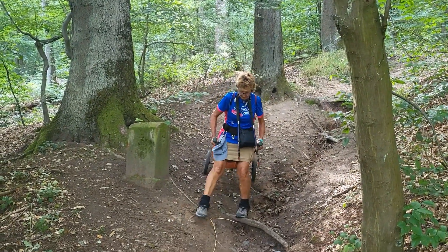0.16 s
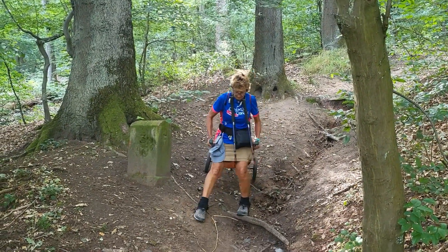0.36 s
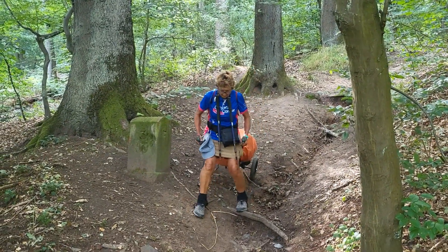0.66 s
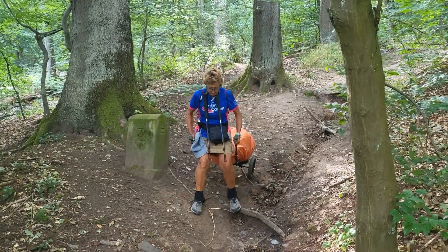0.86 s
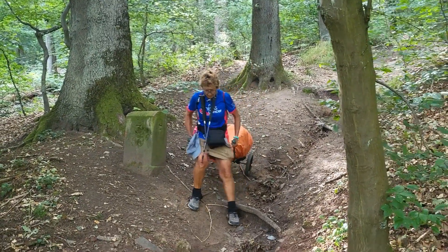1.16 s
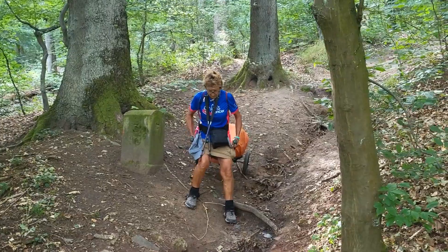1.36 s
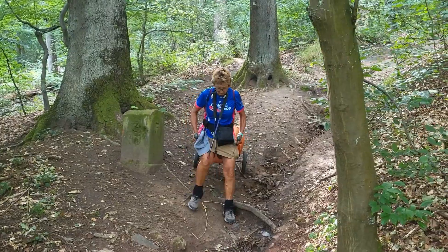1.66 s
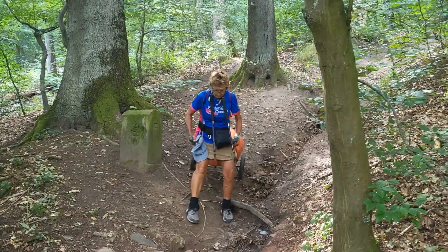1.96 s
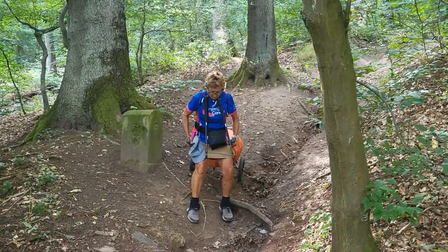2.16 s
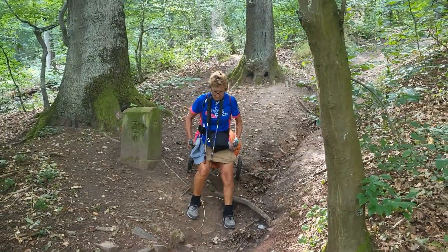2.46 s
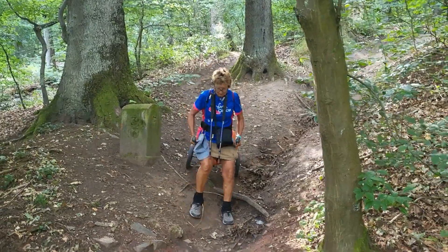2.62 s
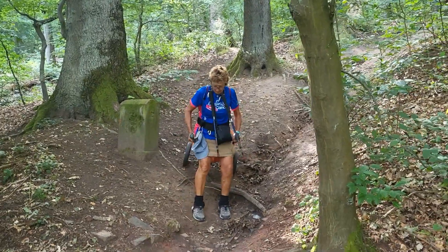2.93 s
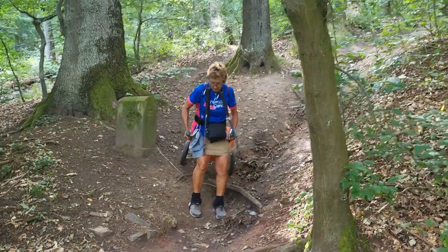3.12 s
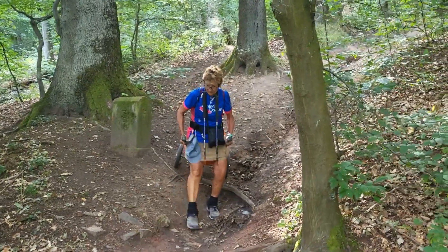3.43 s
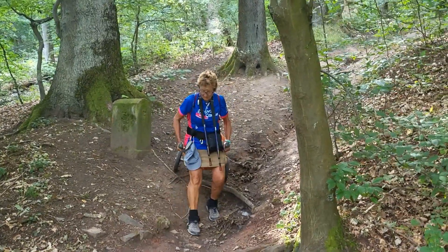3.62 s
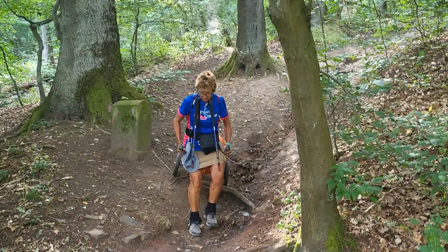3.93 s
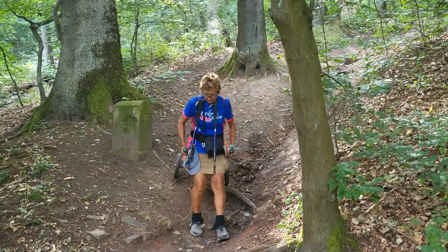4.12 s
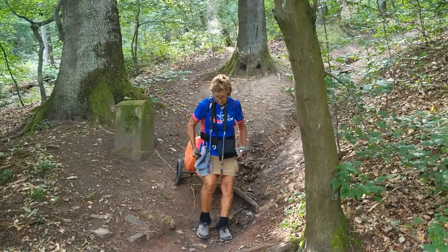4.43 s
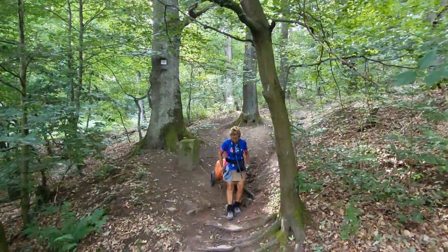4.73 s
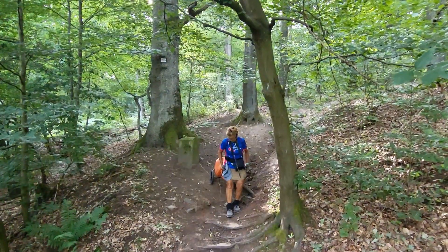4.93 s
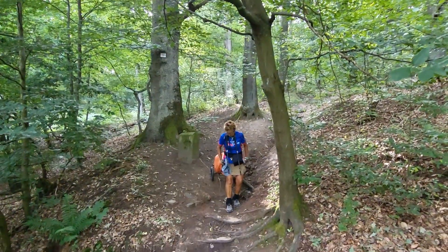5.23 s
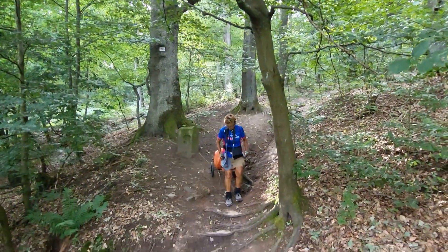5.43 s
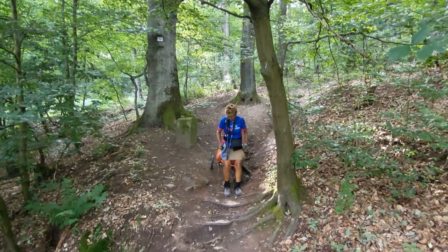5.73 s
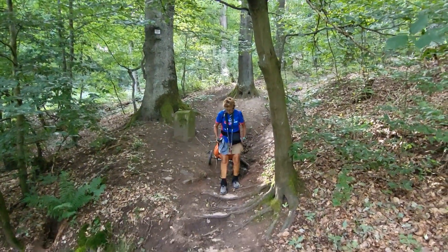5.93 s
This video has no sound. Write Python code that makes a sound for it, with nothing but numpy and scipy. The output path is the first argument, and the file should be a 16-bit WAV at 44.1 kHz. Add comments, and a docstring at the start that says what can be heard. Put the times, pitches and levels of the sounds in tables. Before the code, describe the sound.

Wooden knocks rattle as a small trolley bumps over roots, shoes and pole tips scuff dirt, with water trickling left over low rumble.

```python
"""Low rumble, murmur, hiss and a faint trickle off to the left open a quiet forest; later a low hum wanders.
A walker with poles eases a two-wheeled trolley down a dirt path: it knocks over roots, shoes and pole
tips scuff and click, stones crunch, leaves swish and tyres roll through litter.
Shaped noise makes rumble, murmur and hiss; dying sine modes make bubbles, clicks and knocks;
random clicks make spray and, under level curves, earth, grit, stones, leaves and litter."""
import sys
import numpy as np
from scipy import signal
from scipy.fft import rfft, irfft
from scipy.io import wavfile
from scipy.ndimage import uniform_filter1d

SR = 44100
rng = np.random.default_rng(int(sys.argv[2]) if len(sys.argv) > 2 else 0)


def persist_wave(psi):
    """Save psi, clipped to +-1, as 16-bit WAV."""
    counts = np.round(np.clip(psi, -1, 1) * 32767).astype(np.int16)
    wavfile.write(sys.argv[1], SR, np.atleast_2d(counts).T)


N = 268128
HZ = np.fft.rfftfreq(N, 1 / SR)
TIME = np.arange(N) / SR

# level of the fine bright fizz and small bubbles: time_s, level_db
FIZZ_CURVE = [(0, -54), (.12, -54), (.27, -57), (.42, -49), (.55, -54.5), (.65, -49.5), (1.12, -50.5),
              (1.3, -51.5), (1.65, -49), (1.74, -51), (1.9, -50), (2.22, -50.5), (2.42, -49.5), (2.86, -52),
              (2.94, -50), (3.1, -53.5), (3.24, -51), (3.58, -58.5), (3.72, -54.5), (3.87, -56),
              (4.03, -53), (4.17, -60), (4.28, -52.5), (4.5, -57.5), (4.58, -55), (4.68, -58), (4.9, -53.5),
              (5.1, -58), (5.3, -52.5), (5.5, -57), (6.0, -53.5), (6.08, -60)]
# spectrum of crunching earth: freq_hz, relative_density_db_per_hz
EARTH_SPECTRUM = [(150, 4), (330, 0), (650, 6), (900, 2.5), (1400, -1), (1800, -1.5), (2300, -9.5),
                  (3000, -38), (5000, -35)]


def amp(db):
    """Amplitude ratio of a level in dB."""
    return 10 ** (np.asarray(db) / 20)


def unit(x):
    """Scales x to unit rms."""
    return x / np.sqrt(np.mean(x ** 2) + 1e-20)


def read(points, hz):
    """A spectrum joined by straight lines on a log-frequency axis."""
    f, value = np.transpose(points)
    return np.interp(np.log(hz + 1), np.log(f + 1), value)


def along(rows, s):
    """The columns of a curve at the times s."""
    times, *columns = np.transpose(rows)
    return [np.interp(s, times, column) for column in columns]


def colour(x, spectrum):
    """Gives x a spectrum and unit rms."""
    return unit(irfft(rfft(x) * amp(read(spectrum, HZ)), N))


def add(mix, s, sound):
    """Adds a sound into the mix at s seconds, cut at the end."""
    part = mix[..., max(round(s * SR), 0):][..., :sound.shape[-1]]
    part += sound[..., :part.shape[-1]]


def pair(three, same):
    """Two channels from one shared and two separate signals; same is the shared power."""
    same = np.clip(same, 0, 1)
    return np.sqrt(same) * three[0] + np.sqrt(1 - same) * three[1:]


def noise(spectrum, same):
    """Smooth stereo noise of unit rms."""
    return colour(pair(rng.standard_normal((3, N)), same), spectrum)


def grains(spectrum, per_s, spread_db, same):
    """Stereo crackle of unit rms: random clicks, a few much larger than the rest."""
    size_db = spread_db * np.minimum(rng.exponential(1, (3, N)), 4)
    size = amp(size_db) * rng.standard_normal((3, N))
    struck = rng.random((3, N)) < per_s / SR
    return colour(pair(size * struck, same), spectrum)


def patches(x, depth_db):
    """Lets small patches of pitch and time swell and sink on their own, at unit rms."""
    z = signal.stft(x, nperseg=512, noverlap=384)[2]
    field = rng.standard_normal(z.shape[1:])
    field = uniform_filter1d(field, size=4, axis=0)
    field = unit(uniform_filter1d(field, size=14, axis=1))
    return unit(signal.istft(z * amp(depth_db * field), nperseg=512, noverlap=384)[1][:, :N])


def ring(hz, t60, glide=0, onset=0.00016):
    """One dying mode; glide is its relative rise in pitch per second, t60 and onset are in s."""
    t = TIME[:SR // 6]
    tone = np.sin(2 * np.pi * hz * t * (1 + glide * t / 2))
    decay = np.exp(-np.log(1000) * t / t60)
    return tone * decay * (1 - np.exp(-t / onset))


def lowpass(x, hz, order):
    """Butterworth low-pass."""
    return signal.sosfilt(signal.butter(order, min(hz, SR / 2 - 1), fs=SR, output="sos"), x)


def uneven(start, end, per_s):
    """Irregular moments at a mean rate, each with two random deviations of unit rms."""
    slots = np.arange(start, end, 1 / per_s)
    chance = rng.random((len(slots), 3))
    deviations = np.sqrt(12) * (chance[:, 1:].T - .5)
    return slots + chance[:, 0] / per_s, *deviations


def aside(x, lead_ms):
    """A sound from one side reaches the nearer ear first; positive is left."""
    side = np.array([[1], [-1]])
    return irfft(rfft(x) * np.exp(1j * np.pi * HZ * side * lead_ms / 1000), N)


def woods(x):
    """Sparse echoes off ground and trunks, each band dying at its own speed."""
    # freq_hz, echo_t60_s
    echo_decay = [(100, 0.027), (500, 0.22), (1500, 0.18), (4000, 0.3), (12000, 0.025)]
    taps = rng.standard_normal((2, SR // 2)) * (rng.random((2, SR // 2)) < 2000 / SR)
    taps[:, :100] = 0  # no echo in the first 2.3 ms
    hz, t, z = signal.stft(taps, SR, nperseg=256)
    decay = np.exp(-np.log(1000) * t / read(echo_decay, hz)[:, None])
    tail = signal.istft(z * decay, SR, nperseg=256)[1]
    return signal.fftconvolve(x, tail / np.linalg.norm(tail[0]), axes=1)[:, :N]


def background():
    """Noise as rumble, the mottled murmur of the far forest, and faintly shifting hiss."""
    # time_s, rumble_db, forest_db
    level_curve = [(0, -49, -69), (.33, -48, -66), (1.05, -48.5, -60), (1.75, -45, -62),
                   (2.15, -46.5, -59.5), (3.0, -47, -57), (3.65, -41.5, -57), (3.95, -47, -62),
                   (4.2, -42.5, -58.5), (4.7, -42, -56.5), (5.3, -38, -57), (5.58, -40.5, -60),
                   (5.8, -37, -59), (6.08, -46, -54)]
    # spectra: freq_hz, relative_density_db_per_hz
    rumble_spectrum = [(15, -1), (28, -16), (42, 2), (75, 2.5), (110, -5.5), (160, -6), (250, -17),
                       (400, -26.5), (900, -74)]
    forest_spectrum = [(150, -6), (300, 3.5), (700, 3), (1100, 0.5), (1800, -15), (2800, -13.5),
                       (5000, -21.5)]
    hiss_spectrum = [(1000, -4.5), (2200, -8), (3000, -24), (4400, 4), (8000, 5), (9500, 0), (12000, -3.5),
                     (16000, 2)]
    rumble_db, forest_db = along(level_curve, TIME)
    rumble = amp(rumble_db) * noise(rumble_spectrum, same=0.93)
    murmur = amp(forest_db) * patches(noise(forest_spectrum, same=0.4), depth_db=3.5)
    hiss = amp(-57.0) * patches(noise(hiss_spectrum, same=0.011), depth_db=2.5)
    return rumble + murmur + hiss


def bubble(hz):
    """A bubble rings for a fixed count of cycles and rises a little in pitch."""
    cycles_to_60_db_down = 41.3
    longest_t60_s = 0.069  # acts only below about 600 Hz
    rise_per_s_at_1_khz = 4.7  # relative pitch rise
    t60_s = min(cycles_to_60_db_down / hz, longest_t60_s)
    return ring(hz, t60_s, glide=rise_per_s_at_1_khz * np.sqrt(hz / 10 ** 3), onset=1.15 / hz)


def lesser_drips():
    """Each hollow drips irregularly near its own pitch, its mean level following that of the fizz."""
    # pitch_hz, drips_per_s, level_above_fizz_curve_db
    hollow_rows = [(1245, 1.0, 4), (1880, 2.4, 3), (4000, 2.7, 3.5), (7400, 2.2, 8)]
    detune, spread_db = 0.052, 4  # rms log pitch ratio, rms level
    rows = []
    for hz, per_s, db in hollow_rows:
        s, level_dev, pitch_dev = uneven(0, N / SR, per_s)
        level_db = along(FIZZ_CURVE, s)[0] + db + spread_db * level_dev
        rows += zip(s, level_db, hz * np.exp(detune * pitch_dev))
    return rows


def crackle():
    """Tiny bright spatters, each a few milliseconds of fizz, scattered at random."""
    # freq_hz, relative_density_db_per_hz
    crackle_spectrum = [(900, -12), (1800, -7), (3000, -14), (4100, 4), (5200, -3), (7700, 2.5),
                        (9000, -14), (15000, -10)]
    per_s, fade_s, spread_db = 32, 0.0028, 5.5
    level = np.zeros(N)
    for s, level_dev, _ in zip(*uneven(0, N / SR, per_s)):
        add(level, s, amp(spread_db * level_dev) * np.exp(-TIME[:800] / fade_s))
    return unit(level) * patches(noise(crackle_spectrum, same=0.18), depth_db=5.0)


def trickle():
    """Water off to the left: splashing, ringing drips, many small bubbles, spray and dulled echoes."""
    # single drips, loud and faint: start_s, level_db, pitch_hz
    drip_rows = [(0.039, -36.5, 2340), (.097, -38.5, 2120), (.287, -39, 1960), (0.385, -35.5, 1120),
                 (0.8432, -31, 6400), (1.0137, -30, 4260), (1.0135, -24.5, 7440), (1.0363, -25, 7360),
                 (1.0365, -36, 4120), (1.083, -31, 6400), (1.096, -30, 920), (1.117, -38, 1100),
                 (1.135, -38, 2350), (1.1673, -30, 7450), (1.24, -33.5, 1163), (1.305, -33, 7000),
                 (1.31, -34, 1137), (1.3542, -29.5, 4000), (1.373, -25, 6940), (1.541, -34, 1042),
                 (1.5422, -29, 5460), (1.5543, -25, 4050), (1.617, -32.5, 4500), (1.617, -34.5, 1820),
                 (1.695, -39.5, 1880), (1.793, -26.5, 7760), (1.952, -35, 8350), (2.009, -31, 7350),
                 (2.149, -34.5, 3850), (2.216, -29, 7500), (2.436, -32, 3900), (2.564, -26.5, 2640),
                 (2.761, -29, 7500), (2.914, -35, 3955), (3.435, -40.5, 1780), (3.7, -33.5, 1019),
                 (3.749, -31.5, 677), (3.988, -30.5, 4970), (4.288, -32, 8500), (4.312, -38, 2400),
                 (4.405, -37, 890), (5.105, -56, 1770), (5.342, -35, 667.6), (5.35, -52, 1781),
                 (6.021, -60, 1815)]
    # pitch_hz, relative_bubble_size_db
    bubble_sizes = [(700, -41), (1100, -5), (1900, -4), (2900, -9.5), (4100, -1), (5200, -2), (6300, 3.5),
                    (7700, 1.5), (9000, 5)]
    # spectra: freq_hz, relative_density_db_per_hz
    splash_spectrum = [(1000, -13), (2800, -3), (4100, -1.5), (5500, -1), (7800, 4), (9300, -9),
                       (15000, -11)]
    spray_spectrum = [(1000, -5.5), (1900, -3), (3000, -1.5), (4100, 2), (5000, 2.5), (6200, -7), (7800, 3),
                      (9300, -7.5), (15000, -6.5)]
    crackle_db = -8  # relative to the fizz curve

    drips, crowd, hits = np.zeros(N), np.zeros(N), np.zeros(N)
    for s, db, hz in drip_rows + lesser_drips():
        add(drips, s, amp(db) * bubble(hz))
        hit = np.sqrt(hz / 5000) * np.exp(-TIME[:600] / 0.0019)  # low bubbles splash less
        add(hits, s, amp(db - 12.5) * hit)
    splashes = hits * colour(rng.standard_normal(N), splash_spectrum)

    for hz in np.geomspace(700, 9000, 48):
        size = amp(2.6 * np.minimum(rng.exponential(1, N), 3) + read(bubble_sizes, hz))
        births = rng.random(N) < 16 * np.sqrt(hz / 3000) / SR
        crowd += signal.oaconvolve(size * births, bubble(hz)[:4000])[:N]

    fizz_level = amp(along(FIZZ_CURVE, TIME)[0])
    spray_grains = grains(spray_spectrum, per_s=2000, spread_db=3, same=0.015)
    spray = amp(-3.5) * patches(spray_grains, depth_db=5.5)
    direct = aside(drips + splashes + amp(-5.5) * fizz_level * unit(crowd), lead_ms=0.499)
    echoes = amp(-7.0) * woods(lowpass(direct, hz=3630, order=2))
    return direct + echoes + fizz_level * (spray + amp(crackle_db) * crackle())


def stroke(rise, fade, thud_db, earth_db, grit_db):
    """Power of the thud, earth and grit of one contact: amplitude rises straight, then fades."""
    t = TIME[:SR]
    shape = np.minimum(t / rise, 1) * np.exp(-np.maximum(t - rise, 0) / fade)
    return (amp([[thud_db], [earth_db], [grit_db]]) * shape) ** 2


def scuffs():
    """Steps land sharply, soles and tyres slide in slow swells: thud, crunching earth, fizzing grit."""
    # shoes and pole tips land: start_s, fade_s, thud_db, earth_db, grit_db
    step_rows = [(0.1757, 0.014, -39.5, -42, -42.5), (1.862, 0.016, -36.5, -40, -42),
                 (2.077, 0.021, -36, -36.5, -30), (2.39, 0.015, -49, -60, -46.5),
                 (2.77, 0.039, -56, -44, -48.5), (2.908, 0.009, -66, -47, -45.5),
                 (2.965, 0.029, -37, -41.5, -44), (3.066, 0.012, -41, -42.5, -58),
                 (3.165, 0.025, -44, -46, -46), (3.189, 0.013, -39, -42, -50),
                 (3.232, 0.019, -44, -44.5, -50), (3.505, 0.015, -42, -52, -47.5),
                 (3.61, 0.033, -57, -50, -58), (5.261, 0.017, -50, -45.5, -49.5),
                 (5.735, 0.041, -33.5, -41, -41.5), (5.788, 0.041, -60, -43.5, -43),
                 (5.868, 0.027, -51, -50, -45.5), (5.943, 0.034, -44, -50, -49.5)]
    # soles and tyres slide: peak_s, rise_s, earth_db, grit_db
    slide_rows = [(.61, 0.11, -44.5, -53), (.84, 0.092, -50.5, -68), (1.005, 0.021, -48.5, -47),
                  (2.328, 0.042, -49.5, -42.5), (2.479, 0.029, -51, -52), (2.541, 0.044, -47, -54),
                  (3.317, 0.021, -44.5, -59), (4.064, 0.042, -44.5, -44), (4.92, 0.15, -57.5, -57.5),
                  (5.31, 0.032, -63, -50)]
    # spectra: freq_hz, relative_density_db_per_hz
    thud_spectrum = [(30, -35), (70, 7.5), (150, -7.5), (260, -1.5), (420, -17), (1000, -53)]
    grit_spectrum = [(1200, -10), (2400, -3), (3200, -6.5), (4200, -1), (5000, -3), (6500, -1.5),
                     (8000, -5), (9500, -12), (16000, -32)]
    step_rise_per_fade, slide_fade_per_rise = 0.25, 1
    slide_thud_db = 0  # relative to the earth

    power = np.zeros((3, N))
    for s, fade, *levels in step_rows:
        add(power, s, stroke(step_rise_per_fade * fade, fade, *levels))
    for s, rise, earth_db, grit_db in slide_rows:
        slide = stroke(rise, slide_fade_per_rise * rise, earth_db + slide_thud_db, earth_db, grit_db)
        add(power, s - rise, slide)
    thud, earth, grit = np.sqrt(power)
    thud_noise = noise(thud_spectrum, same=1.0)
    earth_grains = grains(EARTH_SPECTRUM, per_s=1800, spread_db=1.7, same=0.93)
    crumbs = patches(earth_grains, depth_db=3.0)
    grit_grains = grains(grit_spectrum, per_s=7100, spread_db=3.5, same=0.25)
    grit_texture = patches(grit_grains, depth_db=5.5)
    return thud * thud_noise + earth * crumbs + grit * grit_texture


def ticks():
    """Pole tips and pebbles snap: one short ring and splinters a little unlike at each ear."""
    # start_s, tone_level_db, pitch_hz, t60_s
    tick_rows = [(0.177, -32, 1820, 0.0076), (0.177, -28.5, 7370, 0.0064), (0.6427, -23.5, 4700, 0.0029),
                 (0.642, -24, 12000, 0.0014), (.6615, -26.5, 2260, 0.0081), (.681, -30, 2000, .006),
                 (0.705, -33.5, 5870, 0.0075), (.748, -36.5, 4000, 0.0066), (.753, -30, 2720, 0.0055),
                 (1.4272, -28, 2260, 0.024), (1.4292, -27, 6620, 0.015), (1.4285, -36, 4560, 0.012),
                 (1.427, -29, 11800, .007), (1.4311, -34, 2080, 0.016), (1.4319, -26.5, 1920, 0.014),
                 (1.4355, -24, 1840, 0.017), (1.4392, -30, 1850, 0.016), (1.8617, -23, 2100, 0.0088),
                 (1.9713, -34, 2010, 0.0061), (3.1642, -28, 5700, 0.006), (4.29, -48, 9500, 0.014),
                 (5.7327, -29.5, 1490, 0.0076), (5.7343, -31, 4700, 0.0077), (5.79, -25, 2030, 0.006),
                 (5.802, -26.5, 1850, 0.014), (5.804, -32, 2450, .009), (5.813, -31.5, 2570, 0.0065),
                 (5.833, -32, 1540, 0.0057), (5.7485, -34, 1600, 0.011), (5.886, -40, 1700, .008),
                 (5.876, -41, 2500, .007), (5.951, -37.5, 1977, 0.0083)]
    splinter_cycles = 4  # to 60 dB down
    out = np.zeros((2, N))
    for s, db, hz, t60 in tick_rows:
        tone = ring(hz, t60)
        burst = rng.standard_normal((2, 300)) * np.exp(-TIME[:300] / 0.0076)
        splinter = ring(hz, t60=splinter_cycles / hz)
        splinters = signal.fftconvolve(burst, splinter[None], axes=1)[:, :len(tone)]
        add(out, s, amp(db) * (tone + 1.26 * unit(splinters) * np.std(tone)))
    return out


def gravel():
    """Small stones grind under a sole: separate grains that start at once and die away."""
    # start_s, fade_s, level_db
    crunch_rows = [(0.178, 0.0095, -41), (1.868, .04, -50), (2.019, .012, -47), (2.045, 0.0088, -46),
                   (2.08, 0.011, -27.5), (2.968, .02, -44), (3.072, 0.014, -49), (3.508, 0.017, -46),
                   (4.082, 0.014, -42.5), (5.732, 0.033, -37), (5.789, 0.047, -43), (5.87, 0.036, -51)]
    # freq_hz, relative_density_db_per_hz
    stone_spectrum = [(600, -50), (1200, 6.5), (1600, 6), (2300, 10), (3000, -23), (4000, -38)]
    level = np.zeros(N)
    for s, fade, db in crunch_rows:
        add(level, s, amp(db) * np.exp(-TIME[:SR] / fade))
    return level * grains(stone_spectrum, per_s=600, spread_db=2, same=0.32)


def rattle_blows():
    """The loose load strikes many times on a root, each blow ringing a fixed count of cycles."""
    # time_s, mean_relative_body_db, mean_pitch_hz
    rattle_curve = [(0.566, -41, 1100), (.6, -46, 1000), (.612, -43, 905), (.665, -45, 640),
                    (.72, -43, 410), (.765, -44, 356), (0.801, -50, 402)]
    per_s, cycles_to_60_db_down = 84, 15
    clack_db, spread_db = 3, 7  # clack in the table relative to body; rms level spread
    s, level_dev, pitch_dev = uneven(rattle_curve[0][0], rattle_curve[-1][0], per_s)
    db, hz = along(rattle_curve, s)
    db = db + spread_db * level_dev
    hz = hz * np.exp(0.2 * pitch_dev)
    return list(zip(s, db, hz, cycles_to_60_db_down / hz, db + clack_db))


def knocks():
    """Each blow rings a hollow body and a detuned frame, dulled by soil, with a rattle and contact tick."""
    # trolley and poles: start_s, relative_body_db, body_pitch_hz, body_t60_s, relative_clack_db
    knock_rows = [(0.5507, -48, 1200, .005, -30), (0.6073, -6.5, 950, 0.0025, -12),
                  (0.6101, -10.5, 885, 0.0045, -18), (0.613, -14, 825, 0.0077, -20),
                  (0.62, -12, 885, 0.0064, -22), (.6245, -30, 800, .008, -36),
                  (0.6281, -23, 620, 0.012, -33), (.632, -29, 520, .008, -37),
                  (0.6424, -10, 805, 0.0091, -10.5), (0.644, -7, 560, 0.0037, -12),
                  (.6485, -17, 704, 0.018, -16), (0.661, -8.5, 685, 0.0042, -16),
                  (0.6644, -10.5, 764, 0.0041, -21), (.673, -36, 560, 0.023, -35),
                  (0.68, -20, 760, 0.0078, -19), (0.6898, -23, 590, 0.018, -17.5),
                  (0.7034, -29.5, 537, 0.022, -23), (.7075, -31, 604, 0.013, -27),
                  (.714, -27.5, 360, 0.043, -25), (0.7237, -33, 480, 0.017, -38),
                  (0.7431, -23, 388, 0.022, -16.5), (.753, -17.5, 1047, 0.012, -16),
                  (0.7554, -21.5, 340, 0.029, -40), (.7655, -33, 900, 0.011, -27),
                  (0.7676, -30, 340, 0.029, -22), (0.8059, -36, 470, 0.014, -24.5),
                  (.856, -28, 580, 0.0078, -27.5), (.891, -38.5, 380, .02, -40),
                  (.911, -49, 796, .008, -34.5), (1.0, -37, 377, 0.013, -36),
                  (1.218, -36, 720, 0.0096, -43), (1.862, -8, 810, 0.004, -13.5),
                  (1.865, -26, 800, 0.0055, -18), (1.972, -27.5, 190, 0.02, -38),
                  (2.082, -26, 860, 0.0078, -21), (2.086, -22.5, 137, 0.053, -38),
                  (2.089, -28, 624, 0.024, -26), (2.471, -41, 1150, .006, -44),
                  (2.486, -36, 1100, 0.0056, -37), (2.534, -36, 1106, 0.0089, -40),
                  (2.772, -28, 454, 0.01, -25.5), (2.779, -32, 910, 0.0085, -36),
                  (2.785, -45, 700, .008, -28), (2.7997, -17.5, 473, 0.017, -25),
                  (2.823, -31, 400, 0.013, -33), (2.968, -35, 525, 0.018, -33),
                  (3.032, -36.5, 450, 0.021, -37), (3.051, -35, 520, .012, -32),
                  (3.072, -36, 483.5, 0.0073, -31.5), (3.173, -34, 694, 0.012, -31.5),
                  (3.1904, -17, 420, 0.0039, -33), (3.191, -26, 780, 0.01, -39),
                  (3.324, -43, 1110, 0.006, -28), (3.51, -35, 606, 0.01, -32),
                  (3.613, -32, 240, 0.032, -34), (3.648, -39, 572, 0.024, -36),
                  (4.45, -37, 645, 0.016, -36), (5.7464, -17.5, 200.7, 0.023, -30),
                  (5.759, -21, 150, 0.028, -38)]
    # frame modes: mean_pitch_hz, relative_level_db, t60_s
    frame_modes = [(1060, -8, 0.022), (1264, -7.5, 0.016), (1666, 0, 0.009), (2320, -8, 0.022)]
    frame_detune = 0.099  # rms log pitch ratio from blow to blow
    contact_db = -24.5  # relative to the table's clack level

    dull, loose, sharp = np.zeros(N), np.zeros(N), np.zeros((2, N))
    for s, body_db, hz, t60, clack_db in knock_rows + rattle_blows():
        frame = 0
        for mode_hz, db, mode_t60 in frame_modes:
            detuned_hz = mode_hz * np.exp(frame_detune * rng.standard_normal())
            frame = frame + amp(db) * ring(detuned_hz, mode_t60)
        body = amp(body_db + 4.0) * ring(hz, t60, onset=0.28 / hz)
        add(dull, s, body + amp(clack_db - 4.0) * frame)
        add(loose, s, amp(clack_db - 19.0) * np.exp(-TIME[:2000] / 0.0042))
        contact = rng.standard_normal((2, 400)) * np.exp(-TIME[:400] / 0.0019)
        add(sharp, s, amp(clack_db + contact_db) * contact)
    dull = dull - lowpass(dull, hz=126, order=1)  # small bodies radiate little bass
    rattle = loose * noise(EARTH_SPECTRUM, same=0.6)
    return lowpass(aside(dull, lead_ms=-0.092) + rattle, hz=2020, order=6) + sharp


def leaves():
    """Dry leaves are brushed aside: dense grains in soft, bright swells."""
    # peak_s, gaussian_sigma_s, level_db
    swish_rows = [(.83, 0.038, -55), (2.97, 0.016, -50), (3.315, 0.019, -50), (3.745, .02, -53),
                  (4.05, .04, -46.5), (4.27, 0.023, -55), (4.42, 0.018, -62), (4.78, 0.02, -56),
                  (5.17, 0.016, -57), (5.76, 0.036, -54), (5.89, 0.035, -52)]
    # freq_hz, relative_density_db_per_hz
    leaf_spectrum = [(2500, -6), (4000, -3.5), (5500, 2.5), (7000, -2), (9000, -6.5), (15000, -9)]
    level = sum(amp(db) * np.exp(-((TIME - s) / width) ** 2 / 2) for s, width, db in swish_rows)
    rustle = grains(leaf_spectrum, per_s=5000, spread_db=0.5, same=0.26)
    return level * patches(rustle, depth_db=0.5)


def hum():
    """A deep, nearly pure drone in two stretches, wandering in pitch and wavering in level."""
    # two stretches: time_s, pitch_hz, level_before_waver_db
    high_curve = [(1.2, 62.84, -46.5), (1.7, 67.3, -47.5), (1.99, 67.6, -41)]
    low_curve = [(2.1, 44.7, -47), (2.28, 47.04, -38), (2.7, 50.3, -42.5), (3.15, 54.3, -43.5),
                 (3.45, 54.44, -36.5), (3.75, 50.65, -42), (4.3, 46.28, -36.5), (4.65, 42.73, -53),
                 (5.3, 41.73, -37.5), (6.05, 39.3, -45.5)]
    waver_rms_db, waver_cutoff_hz = 3, 5
    out = np.zeros(N)
    for rows in (high_curve, low_curve):
        t = np.arange(rows[0][0], rows[-1][0], 1 / SR)
        hz, db = along(rows, t)
        phase = 2 * np.pi * np.cumsum(hz) / SR
        tone = np.sin(phase) + amp(-27.0) * np.sin(3 * phase)
        add(out, t[0], np.sqrt(2) * amp(db) * tone * signal.windows.tukey(len(t), .04))
    waver = unit(lowpass(rng.standard_normal(N), waver_cutoff_hz, order=2))
    return out * amp(waver_rms_db * waver)


def tyres():
    """Tyres roll through soft leaf litter: grains rustling in swells."""
    # time_s, level_db
    rolling_curve = [(3.3, -67), (3.42, -58), (3.68, -62), (3.82, -66), (4.0, -62), (4.16, -61),
                     (4.3, -56.5), (4.42, -58), (4.66, -71), (4.74, -57), (4.8, -65), (4.9, -56),
                     (5.0, -56), (5.06, -77), (5.16, -56), (5.22, -70), (5.36, -62), (5.5, -66.5),
                     (5.58, -82), (5.68, -55.5), (5.73, -49), (5.92, -55.5), (6.05, -65)]
    # freq_hz, relative_density_db_per_hz
    litter_spectrum = [(300, -12), (800, -1.5), (1300, 0), (1800, -1.5), (2300, -2.5), (3000, -15),
                       (5000, -20)]
    litter = grains(litter_spectrum, per_s=1500, spread_db=2, same=0.35)
    return amp(along(rolling_curve, TIME)[0]) * patches(litter, depth_db=4.0)


def scene():
    """The path sounds with their forest echo, over water, hum and background."""
    path = knocks() + scuffs() + gravel() + leaves() + ticks() + tyres()
    return path + amp(-15.0) * woods(path) + trickle() + hum() + background()


def record(dry):
    """Two microphone ports differ in colour and phase; a steep low-pass then limits the band."""
    # freq_hz, left_minus_right_db
    port_level = [(60, -0.5), (700, 0.5), (1000, -2), (1300, -4), (1800, -8), (2300, -3.5), (3000, 6),
                  (4200, 0.5), (5000, -1), (6500, -3), (9000, 0), (15000, 0.5)]
    # freq_hz, left_lead_rad
    port_phase = [(30, 0.72), (60, 0.25), (120, 0), (300, 0.18), (600, 0)]
    edge_hz = 15950
    half = np.array([[.5], [-.5]])
    ports = amp(half * read(port_level, HZ)) * np.exp(1j * half * read(port_phase, HZ))
    heard = irfft(rfft(dry) * ports, N)
    band_limit = signal.firwin(511, edge_hz, window=("kaiser", 9), fs=SR)
    return signal.oaconvolve(heard, band_limit[None], "same")


dry = scene()
out = record(dry)
persist_wave(out)
```